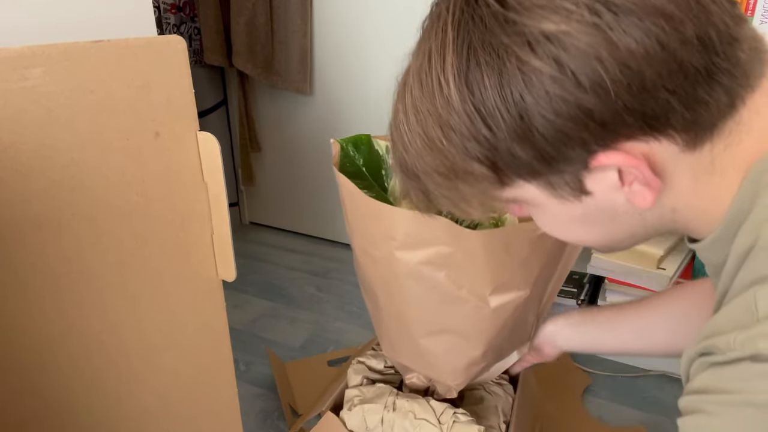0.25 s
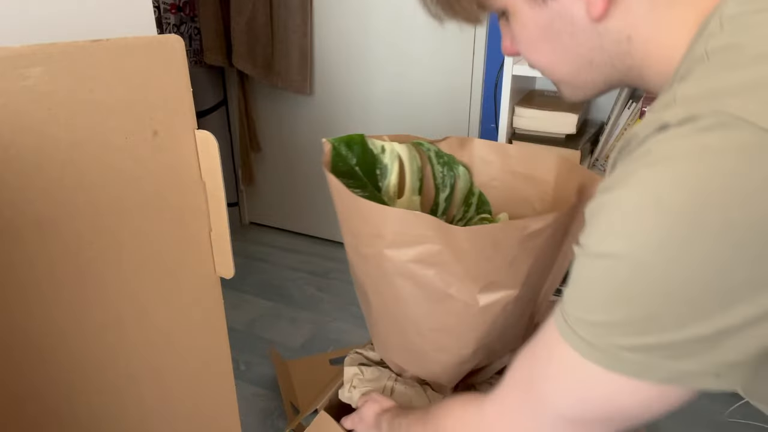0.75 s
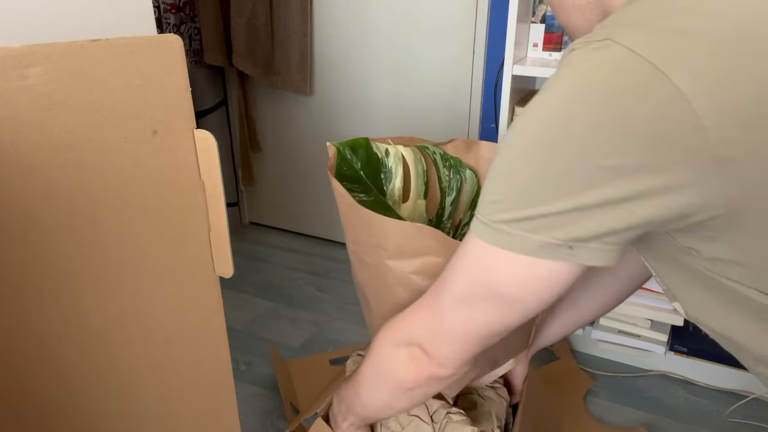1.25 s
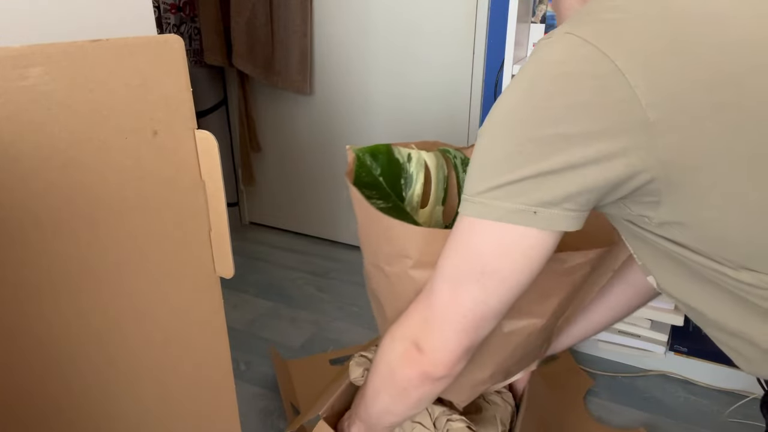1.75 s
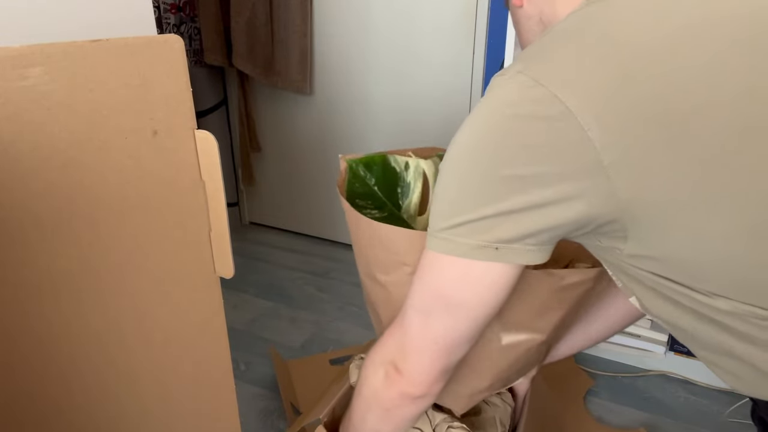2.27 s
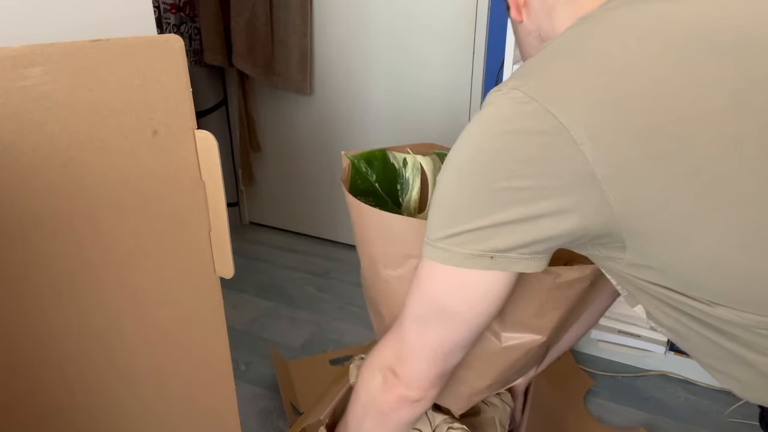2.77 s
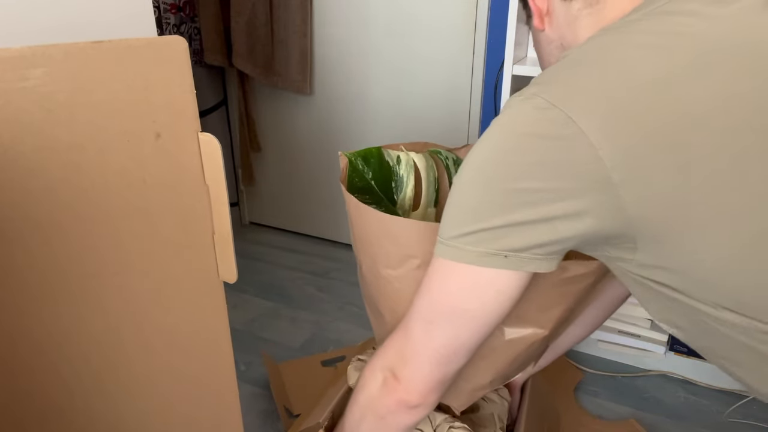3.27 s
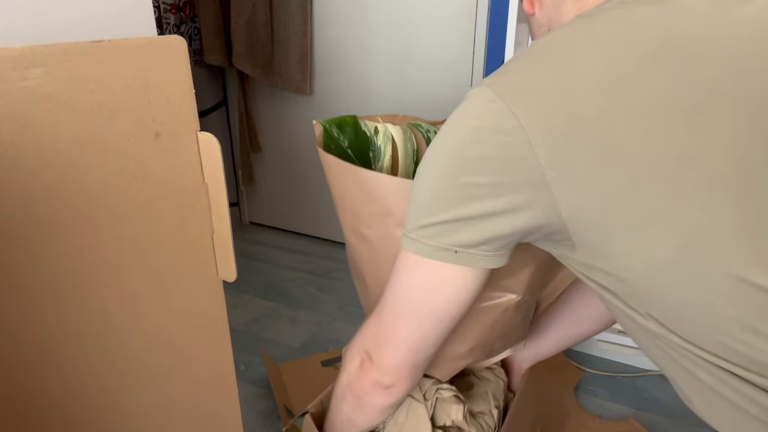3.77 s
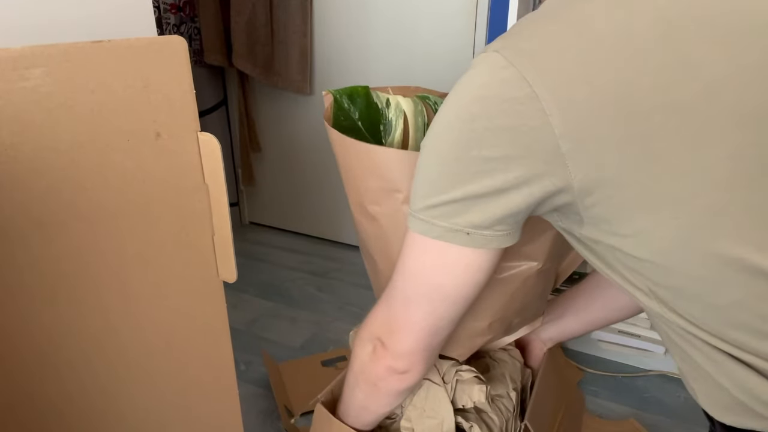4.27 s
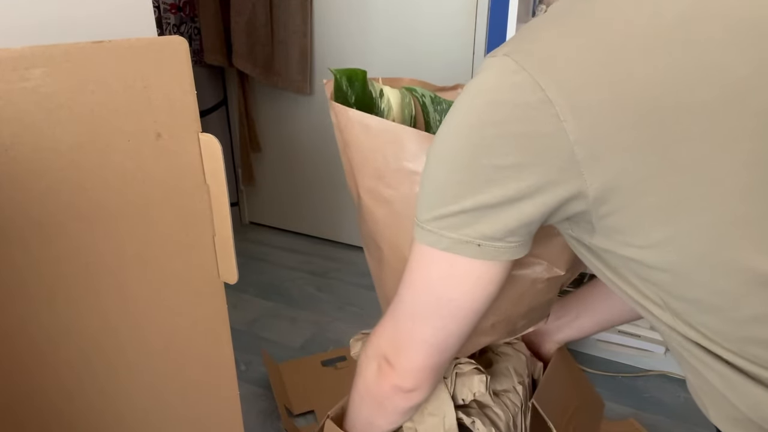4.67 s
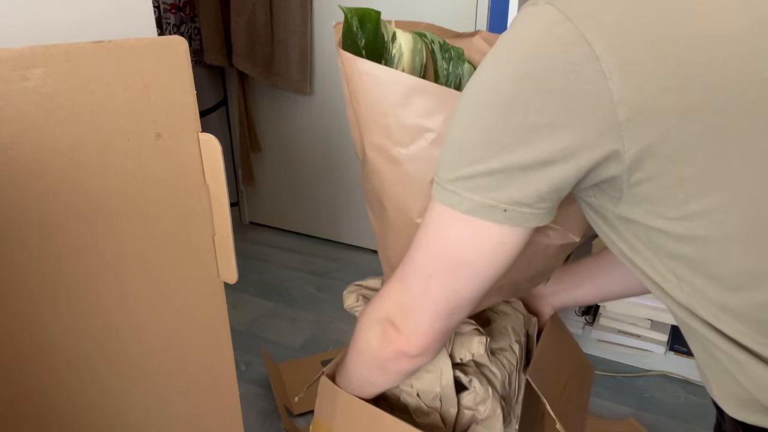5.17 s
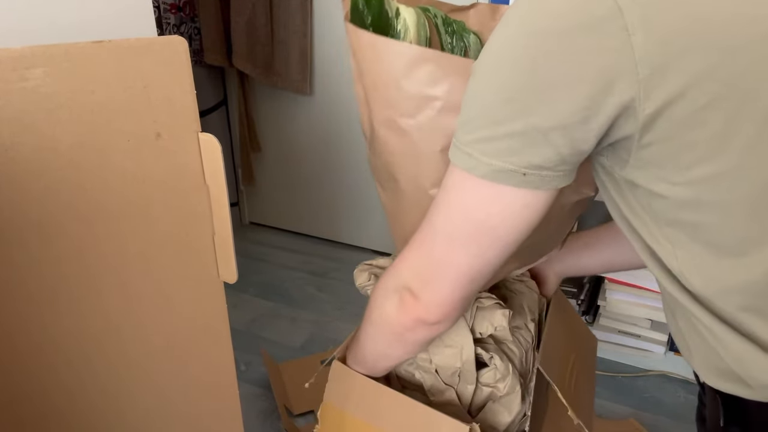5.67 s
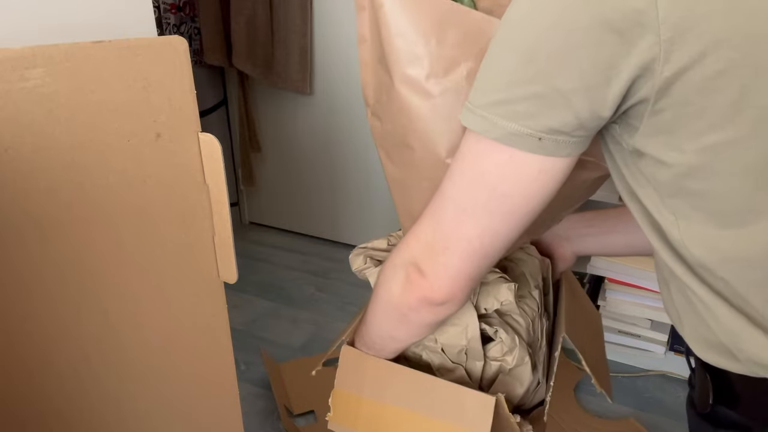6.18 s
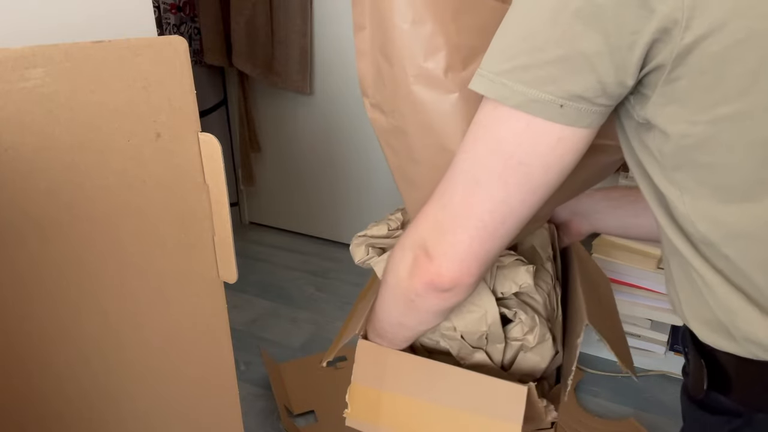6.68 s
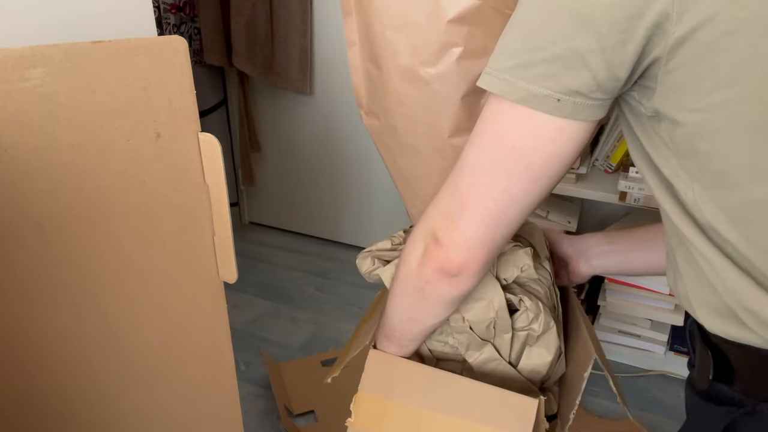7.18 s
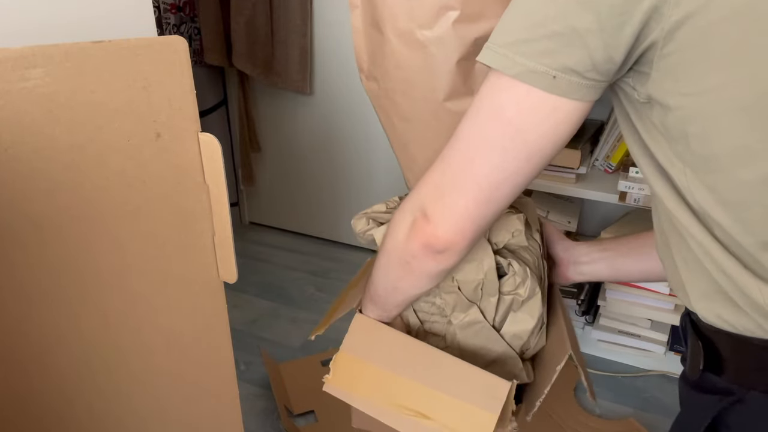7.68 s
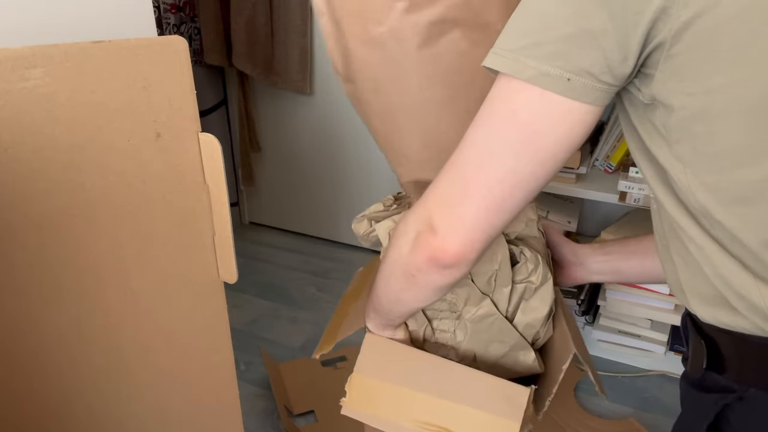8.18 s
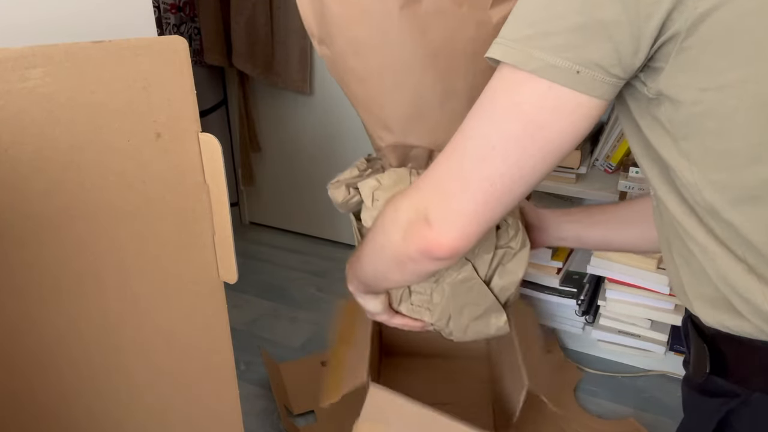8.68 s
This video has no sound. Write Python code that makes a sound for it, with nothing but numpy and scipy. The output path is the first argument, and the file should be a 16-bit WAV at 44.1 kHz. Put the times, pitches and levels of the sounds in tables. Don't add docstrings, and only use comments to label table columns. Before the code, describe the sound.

Close up in a small, fairly dry room, hands dig into crumpled brown packing paper inside a cardboard box. Crisp ticks, snaps and clumpy rustling mix with dull knocks on the box walls, strongest early on. Rustling thickens as a wrapped pot is worked upward, then the empty box falls away with one loud hollow thump, a few quick bounces and a little crackle.

```python
import sys
import numpy as np
from scipy import signal
from scipy.fft import rfft, irfft, next_fast_len
from scipy.io import wavfile

SR = 44100
rng = np.random.default_rng(int(sys.argv[2]) if len(sys.argv) > 2 else 0)


def nominal_scale(level):
    x = np.asarray(level, float) / 20
    return 10 ** x


def transcribe(u):
    v = np.clip(np.atleast_2d(u).T, -1, 1)
    q = np.round(v * 32767).astype(np.int16)
    wavfile.write(sys.argv[1], SR, q)


N = 394254
SIZE = next_fast_len(N + SR)
HZ = np.maximum(np.arange(SIZE // 2 + 1) * SR / SIZE, 1)

# f/Hz, level/dB
HUSH_COLOUR = [(30, -30), (80, -3), (300, -6), (1000, -14), (3000, -21), (15000, -29)]
HUSH_DB = -56
# f/Hz, t60/s
REVERBERATION = [(100, 0.18), (1000, 0.3), (8000, 0.19)]
# f/Hz, level/dB
DIFFUSE_LEVEL = [(60, -14), (130, -10), (300, -7.5), (700, .5), (2000, 2), (4500, 3), (6500, -2),
                 (7700, -9), (8600, -9), (10400, -10), (12800, -7), (15000, -8)]
# f/Hz, phase/rad
PORT_PHASE = [(0, 0), (3450, .4), (4130, -.7), (5340, -1), (6030, -2.3), (7240, -3.1), (8790, -3.4),
              (10500, -6.27), (12800, -6.3), (14400, -9.4), (16100, -9.4)]
# f/Hz, level/dB
PORT_LEVEL = [(60, 3.5), (200, 2), (700, 2.5), (2400, 1.5), (4400, 4), (8100, 1), (10500, 0)]

# f/Hz, level/dB, t60/s
BOX_MODES = [(71, 5.5, 0.15), (83.6, -4, 0.46), (116, 2.5, 0.16), (150.5, -3.5, 0.15), (181.5, 3, 0.097),
             (245, 4.5, 0.094), (274.6, 3, 0.089), (300, -9, 0.057), (378, 1, 0.047), (411, -8.5, 0.18),
             (440, 8.5, 0.049), (520, -9, 0.03), (560, 4, 0.072), (700, -36, 0.053), (670, 9, 0.042),
             (1032, 15, 0.03), (331, -5, 0.1)]
# t/s, peak level/dB, f of the struck
# wall/Hz, scuffle length/ms
KNOCKS = [(0.097, -19, 590, 9.9), (0.115, -21.5, 100, 10), (0.199, -24, 378, 2.2), (0.279, -28, 80, 5.6),
          (0.413, -25.5, 494, 11), (0.689, -32, 498, 2.5), (1.341, -24, 346, 4.3), (1.597, -11.5, 643, 5),
          (1.698, -24, 100, 3.3), (2.3, -26, 520, 4.5), (1.957, -20, 115, 2.6), (1.985, -27, 89.5, 2.5),
          (2.093, -27, 390, 5.8), (2.762, -26.5, 560, 4.1), (5.381, -30, 133, 3.7), (4.303, -23, 500, 4.4),
          (6.925, -26, 90, 3.6), (6.985, -40, 90, 4.5), (8.19, -31, 85, 4), (8.322, -36, 116, 3),
          (1.527, -29, 198, 5.9), (1.623, -9, 310, 3.4), (1.636, -10, 240, 3.4), (1.656, -24, 230, 4),
         (1.808, -16, 196, 3.8), (1.828, -25, 199, 2.9), (2.999, -17.5, 426, 7), (3.006, -15.5, 185, 2.6),
         (3.029, -25, 284, 1.8), (8.682, -2.5, 700, 6.3), (8.689, -1, 417, 4.9), (8.702, -13, 110, 3.1),
         (8.776, -18, 1000, 5.2), (8.684, -0.5, 190, 3.7), (8.702, -6, 396, 4.1), (8.706, -9.5, 278, 3.5),
         (8.721, -12, 125, 5.1), (8.744, -18, 367, 3.1), (8.752, -16, 105, 5.6), (8.795, -24.5, 96, 4),
         (8.818, -14, 108, 5.3), (8.845, -34, 121, 3.7), (8.887, -27.5, 90.3, 6.6), (8.925, -47, 89, 4.2)]
HITS = KNOCKS
CONTACT_CYCLES = 0.4
OWN_DB, OWN_CYCLES = -6.0, 8.1
# t/s, peak level/dB, f/Hz
FLEXES = [(0.126, -36, 131), (.15, -34, 100), (.275, -31, 89), (1.634, -22, 152), (1.702, -33, 94.5),
          (1.75, -36, 80), (1.81, -25, 146), (2.0, -30, 85), (2.671, -33, 140), (3.013, -24, 140),
          (6.925, -25, 149), (7.556, -36, 150), (8.115, -38, 109), (8.322, -31, 129), (8.686, -9, 220),
          (8.712, -7, 292), (8.74, -28, 370), (8.814, -20.5, 255), (8.79, -24, 222), (8.851, -33, 199),
          (8.77, -25, 352), (2.03, -32, 80.6), (1.665, -30, 140), (8.691, -9, 430)]
# t/s, peak level/dB, f/Hz
FLIPS = [(0.413, -32, 606), (0.833, -28, 540), (1.401, -17, 710), (2.095, -30, 388), (2.762, -21, 589),
         (3.282, -30, 942), (3.418, -24, 560), (3.882, -24, 522), (4.302, -39, 711), (4.704, -31, 1330),
         (4.734, -26, 1170), (4.752, -25, 1330), (4.851, -29, 574), (4.876, -20, 545), (5.755, -24, 800),
         (6.019, -20.5, 1430), (6.063, -39, 404), (6.154, -29, 980), (6.243, -27, 813), (6.255, -39, 409),
         (6.912, -21, 990), (7.099, -31, 883), (7.461, -36, 1160), (7.554, -33, 600), (7.628, -22, 597),
         (7.648, -28, 380), (7.725, -23, 600), (7.746, -34, 662), (7.789, -28, 650), (8.762, -16, 380)]
FLIP_DB, FLIP_CYCLES = -5, 12.5
HOLLOW_HZ, HOLLOW_WIDTH_HZ = 1280, 210
SLIDE_S, SLIDE_HALF_S = 4.75, 0.46

# f/Hz, level per Hz/dB
PAPER_COLOUR = [(150, -11), (300, -6), (420, -2), (600, -1), (960, -3), (1500, -6), (3000, -11),
                (5400, -14), (7900, -12.5), (11000, -22.5), (13500, -24), (15800, -32.5), (16500, -52)]
SPLIT_HZ = 2340
# t/s, rummaging level/dB, level of weight leaning on the walls/dB
EFFORT = [(0, -49.5, -57), (.3, -68, -48.5), (.62, -51, -59), (.95, -48, -54), (1.25, -44, -55),
          (1.5, -47, -45.5), (2.05, -48.5, -55), (2.7, -52.5, -57), (3.35, -53, -56), (3.7, -45.5, -57.5),
          (4.1, -51, -51), (4.5, -44.5, -51.5), (5.0, -55, -58), (5.4, -45, -54.5), (6.0, -56, -62),
          (7.15, -47, -52.5), (8.3, -54, -56), (8.94, -56, -75)]
THICK_DB = 4
# t/s, peak level/dB, thick folds
# against it/dB, swell/ms
SQUEEZES = [(.11, -54, 13.5, 27), (.2, -48, 4, 470), (.32, -41, 5.5, 55), (.17, -48, 11, 30),
            (0.421, -38, 5.5, 50), (.485, -41, 0, 60), (.56, -45.5, -2, 120), (.69, -39, 1, 58),
            (.77, -47.5, 3, 56), (.86, -44.5, -9, 100), (1.12, -60, 2, 49), (1.368, -38, 4, 45),
            (1.49, -47, -3, 310), (1.6, -37, 0, 26), (1.82, -39.5, 8, 33), (2.111, -40.5, 3, 71),
            (2.23, -49, 6, 43), (2.321, -43, 4, 44), (2.491, -41, 1.5, 110), (2.67, -51.5, 8.5, 30),
            (2.87, -47, 2, 77), (3.01, -47, 6.5, 65), (3.189, -45.5, 2, 39), (3.29, -52, 12.5, 61),
            (3.48, -54, 13, 370), (3.6, -52, 3, 43), (3.66, -44.5, 6, 130), (3.79, -39.5, -3, 37),
            (3.925, -45, 6.5, 69), (4.1, -43.5, -3, 50), (4.31, -54.5, 15, 120), (4.41, -44, 0, 60),
            (.092, -42.5, 9, 20), (2.992, -37, -1, 9), (1.335, -39, 3, 17),
            (4.72, -39.5, 5.5, 83), (4.864, -42, 7, 36), (4.95, -54, 12, 62), (5.14, -46.5, 6, 40),
           (5.329, -44, -5, 75), (5.45, -48, 4, 32), (5.76, -51, 7, 45), (6.03, -45.5, -9, 43),
           (6.17, -44.5, 4, 150), (6.257, -46, 6.5, 23), (6.55, -51.5, 7, 540), (6.575, -41, -1, 53),
           (6.7, -41, 2.5, 50), (6.922, -34.5, 6, 43), (6.97, -37, 2.5, 115), (7.11, -56, 10, 31),
           (7.22, -40.5, 6, 47), (7.46, -45.5, 7, 100), (7.527, -35.5, 1, 30), (7.69, -43, 3.5, 71),
           (7.79, -39.5, 0.5, 50), (7.92, -46.5, 7.5, 190), (7.98, -43, 5, 120), (8.12, -39, -2, 46),
           (8.181, -34, 4, 58), (8.33, -50.5, 10.5, 160), (8.528, -42.5, 3.5, 120), (8.695, -35, 5.5, 19),
           (8.78, -43.5, 7, 44), (8.677, -36, 11, 8)]
RELEASE_SLOWER = 1.06
WALLS_SQUEEZED_DB = -21.5
# t/s, depth/dB, half length/s
PAUSES = [(0.617, 1.5, 0.037), (1.275, 1, 0.033), (1.71, 1.5, 0.085), (1.955, 4, 0.15), (2.97, 4, 0.022),
          (3.097, 11, 0.067), (3.407, 4.5, 0.044), (3.98, 5.5, 0.03), (4.675, 6, 0.049), (5.068, 17, 0.052),
          (5.226, 3, 0.047), (5.92, 0.5, 0.062), (6.412, 5, 0.1), (6.79, 2, 0.095), (7.34, 4.5, 0.15),
          (8.032, 7.5, 0.053), (8.632, 24, 0.07)]
TAUT_S, TAUT_DB = 0.029, 0.5

# t/s, peak level/dB
SPITS = [(0.1999, -21), (0.2902, -34), (0.5521, -31), (0.7542, -41), (1.234, -21), (1.3394, -34),
         (1.4795, -36), (1.5165, -30), (1.5913, -30), (1.8023, -30), (2.4613, -24), (2.9951, -28),
         (3.1666, -31), (3.5748, -43), (3.6087, -32), (3.7299, -34), (3.8786, -35), (4.0811, -39),
         (4.2502, -41), (4.6857, -34), (4.9347, -46), (5.1372, -41), (5.4331, -35), (6.1539, -37),
         (6.2462, -32), (6.4921, -47), (6.5256, -37), (6.6124, -29), (6.6543, -39), (6.6543, -33),
         (6.6862, -37), (6.9132, -28), (7.7877, -32), (8.6815, -27), (8.782, -29), (8.884, -32)]
SPIT_DB, SPIT_T60_S, SPIT_LOW_HZ, SPIT_HIGH_HZ = -4, 0.015, 8300, 15000
# t/s, peak level/dB
POPS = [(0.378, -51), (0.833, -30.5), (1.097, -47), (1.4, -25.5), (1.515, -23), (1.578, -22.5),
        (1.721, -32), (1.789, -35), (1.981, -34), (2.484, -29), (2.598, -35), (2.669, -36), (2.739, -33),
        (2.763, -32.5), (3.418, -28.5), (3.484, -30.5), (3.527, -30), (3.879, -27), (4.302, -31),
        (4.593, -39), (5.092, -33), (5.687, -40), (5.756, -38), (6.021, -38), (6.296, -33), (6.824, -36),
        (7.462, -33), (7.629, -33), (7.745, -29.5), (8.069, -51)]
# t/s, peak level/dB, after-crackle level/dB
TICKS = [(0.202, -28, -29), (.552, -24.5, -10), (1.299, -32, 1), (1.858, -31, -11), (2.214, -35, -7),
         (2.462, -23, -15.5), (2.708, -32.5, -18), (3.146, -36, -11), (3.468, -30.5, -7),
         (3.575, -20.5, -7), (3.909, -34, 1), (4.038, -32.5, -5), (4.218, -46, -21), (4.251, -24, -20),
         (4.687, -23, -13), (4.937, -32.5, -11), (5.128, -34.5, -2.5), (5.8, -28.5, -19), (5.837, -35, -13),
         (6.064, -36, -10), (6.138, -31, -3), (6.155, -22, -6.5), (6.493, -25.5, -14), (6.526, -30, -0.5),
         (6.556, -32, -16), (6.612, -31, -4), (6.89, -37, -13), (7.891, -28, -16), (8.152, -30, 3),
         (8.885, -36, -5), (0.086, -31, -15), (0.471, -31.5, 0.5), (2.226, -31, -4.5), (3.655, -34, -16),
         (3.731, -29, -12), (4.635, -37, -13), (4.753, -35, -17), (4.792, -38, -4), (5.909, -39.5, -4),
         (6.253, -27, -15), (6.805, -43, -3), (6.897, -26, -14), (6.972, -28, -13), (8.051, -43, -7),
         (8.321, -34, -1)]
# t/s, crack peak level/dB, thick part level/dB, after-crackle level/dB
SNAPS = [(0.096, -37, -33, -9), (0.292, -30, -42, -12), (.413, -33, -31, -1.5), (0.678, -25.5, -30.5, -3),
         (.755, -27, -32, -1.5), (1.114, -30.5, -27, -8.5), (1.234, -11.5, -23, -30),
         (1.341, -28.5, -30.5, -2), (1.375, -26, -23, -16), (1.48, -36, -29.5, -2.5),
         (1.592, -19, -19.5, -2), (1.804, -37, -22, -11), (2.097, -36, -28, -17), (2.859, -39, -30.5, -4),
         (2.995, -22, -22.5, -20), (3.167, -19, -38, -6), (3.281, -33.5, -29.5, -6.5),
         (3.61, -22.5, -40, -6.5), (4.082, -22.5, -25.5, -8), (4.878, -46, -28, -19),
         (5.435, -23.5, -37, -8), (6.244, -34.5, -37, 1), (6.645, -31, -32.5, 0), (6.685, -27.5, -32, -2.5),
         (6.915, -18, -24, -10.5), (7.099, -22.5, -25.5, -13.5), (7.788, -25, -26.5, -13),
         (8.681, -14, -7.5, -9), (8.763, -44, -25, -10), (8.778, -33, -32, -8)]
TICK_THICK_DB, POP_CRACK_DB = -18, -8.5
SNAP_T60_S, TICK_T60_S, POP_T60_S, POP_AFTER_DB = 0.14, 0.099, 0.15, -8
CRACK_DULL_HZ = 14000


def rms_one(x):
    return x / np.sqrt(np.mean(x ** 2) + 1e-20)


def on_grid(points):
    hz, value = np.transpose(points)
    return np.interp(np.log(HZ), np.log(np.maximum(hz, 1)), value)


def shaped(x, response):
    return irfft(rfft(x, SIZE) * response, SIZE)[..., :N]


def causal(db):
    cepstrum = irfft(db * np.log(10) / 20, SIZE)
    cepstrum[1:SIZE // 2] *= 2
    cepstrum[SIZE // 2 + 1:] = 0
    return np.exp(rfft(cepstrum))


def resonance(hz, r):
    return [1, -2 * r * np.cos(2 * np.pi * hz / SR), r * r]


def drift(rate_hz):
    r = np.exp(-2 * np.pi * rate_hz / SR)
    noise = rng.standard_normal(N + SR)
    return rms_one(signal.lfilter([1], [1, -2 * r, r * r], noise)[SR:])


def hush():
    return nominal_scale(HUSH_DB) * rms_one(shaped(rng.standard_normal(N), nominal_scale(on_grid(HUSH_COLOUR))))


def echoes():
    age, tails = np.arange(SR // 2) / SR, 0
    early = 1 + 5.7 * nominal_scale(-60 * age / 0.017)
    for k, (hz, t60) in enumerate(REVERBERATION):
        band = on_grid([(row[0], float(j == k)) for j, row in enumerate(REVERBERATION)])
        echo = rng.standard_normal((2, len(age))) * nominal_scale(-60 * age / t60) * early * (age > .0008)
        echo = echo / np.sqrt(np.sum(echo ** 2, axis=1, keepdims=True))
        tails = tails + np.sqrt(band) * rfft(echo, SIZE)
    return tails


def room(direct, spots=7):
    near = nominal_scale(32 * np.array([drift(17.0) for spot in range(spots)]))
    shares = direct * near / np.sqrt(np.sum(near ** 2, axis=0))
    diffuse = sum(rfft(share, SIZE) * echoes() for share in shares)
    wet = nominal_scale(on_grid(DIFFUSE_LEVEL))
    sides = np.array([[.5], [-.5]])
    ports = nominal_scale(sides * on_grid(PORT_LEVEL)) / np.sqrt(1 + wet ** 2)
    lead = np.exp(1j * sides * np.interp(HZ, *np.transpose(PORT_PHASE)))
    return irfft(ports * (rfft(direct, SIZE) * lead + wet * diffuse), SIZE)[:, :N]


def blows():
    age_ms = np.arange(1024) / SR * 1000
    scuffles = rng.standard_normal((len(HITS), 1024))
    s, db, centre_hz, length_ms = np.transpose(HITS)[..., None]
    box_hz, box_db, _ = np.transpose(BOX_MODES)
    strengths = rng.normal(0, 1.5, (len(HITS), len(BOX_MODES)))
    strengths = strengths - 13 * abs(np.log2(box_hz / centre_hz)) ** 1.4
    total_db = 10 * np.log10(np.sum(nominal_scale(strengths + box_db) ** 2, axis=1, keepdims=True))
    strengths = strengths + db - 13.0 - total_db
    contact = np.sin(np.pi * np.minimum(age_ms * centre_hz / 1000 / CONTACT_CYCLES, 1)) ** 2
    contact = contact / contact.sum(axis=1, keepdims=True)
    pushes = 0.16 * scuffles * np.exp(-age_ms / length_ms) + 1.49 * contact
    return s[:, 0], pushes, strengths


def box(rub):
    times, pushes, strengths = blows()
    walls = 0
    for k, (hz, mode_db, t60) in enumerate(BOX_MODES):
        force = np.zeros(N + 1024)
        for at, push, strength_db in zip(times, pushes, strengths[:, k]):
            start = round(at * SR)
            force[start:start + 1024] += nominal_scale(strength_db) * push
        drive = [force[:N] + 1e-18, rub]
        rung = signal.lfilter([0, np.sin(2 * np.pi * hz / SR)], resonance(hz, nominal_scale(-60 / (t60 * SR))), drive)
        walls = walls + nominal_scale(mode_db) * rung * (-1) ** k
    return walls


def thuds(rows, gain_db, cycles):
    out, age = np.zeros(N + 8192), np.arange(8192) / SR
    for s, db, hz, *_ in rows:
        turns, start = age * hz, round(s * SR)
        swing = np.minimum(2 * turns, 1) * np.sin(2 * np.pi * turns)
        out[start:start + 8192] += nominal_scale(db + gain_db - 60 * turns / cycles) * swing
    return out[:N]


def hollow(paper):
    r = np.exp(-np.pi * HOLLOW_WIDTH_HZ / SR)
    opening = np.clip(2 - 2 * abs(np.arange(N) / SR - SLIDE_S) / SLIDE_HALF_S, 0, 1)
    return opening * signal.lfilter([(1 - r * r) / 2, 0, (r * r - 1) / 2], resonance(HOLLOW_HZ, r), paper)


def buckles(per_s, spread_db, clump_db, patch_t60, click):
    clumps = clump_db * (drift(9.6) + 0.38 * drift(60))
    sizes = nominal_scale(spread_db * np.minimum(rng.exponential(1, N), 5) + clumps)
    born = sizes * (rng.random(N) < per_s * nominal_scale(clumps) / SR)
    shiver = np.sqrt(signal.lfilter([1], [1, -nominal_scale(-120 / (patch_t60 * SR))], born ** 2 + 1e-12))
    return rms_one(rng.standard_normal(N) * (shiver + click * born))


def folds():
    big = [(s, db, thick_db, SNAP_T60_S, after_db) for s, db, thick_db, after_db in SNAPS]
    thin = [(s, db, db + TICK_THICK_DB, TICK_T60_S, after_db) for s, db, after_db in TICKS]
    thick = [(s, db + POP_CRACK_DB, db, POP_T60_S, POP_AFTER_DB) for s, db in POPS]
    return big + thin + thick


def hands():
    now = np.arange(N) / SR
    s, work_db, weight_db = np.transpose(EFFORT)
    pause_db = -sum(depth_db * np.clip(1.6 - 1.61 * abs(now - at) / half, 0, 1) for at, depth_db, half in PAUSES)
    for at, *_ in folds():
        pause_db[round((at - TAUT_S) * SR):round(at * SR)] -= TAUT_DB
    thin = nominal_scale(np.interp(now, s, work_db)) ** 2
    thick = thin * nominal_scale(THICK_DB) ** 2
    walls = nominal_scale(np.interp(now, s, weight_db)) ** 2
    for at, db, thick_db, swell_ms in SQUEEZES:
        near = slice(max(round((at - .6) * SR), 0), round((at + .6) * SR))
        away = np.maximum(at - now[near], (now[near] - at) / RELEASE_SLOWER)
        power = nominal_scale(db - 10000 * away / swell_ms) ** 2
        thin[near] += power
        thick[near] += power * nominal_scale(thick_db) ** 2
        walls[near] += power * nominal_scale(thick_db + WALLS_SQUEEZED_DB) ** 2
    return np.sqrt([thin, thick, walls]) * nominal_scale(pause_db * [[1], [1], [.4]])


def spits():
    out, age = np.zeros(N + 1024), np.arange(1024) / SR
    for s, db in SPITS:
        start = round(s * SR)
        out[start:start + 1024] += nominal_scale(db + SPIT_DB - 60 * age / SPIT_T60_S) * rng.standard_normal(1024)
    band = signal.butter(2, [SPIT_LOW_HZ, SPIT_HIGH_HZ], "band", fs=SR, output="sos")
    return signal.sosfilt(band, out[:N] + 1e-18)


def snaps():
    thin, thick, age = np.zeros(N + 8192), np.zeros(N + 8192), np.arange(8192) / SR
    for s, crack_db, thick_db, t60, after_db in folds():
        noise, at = rng.standard_normal((3, 8192)), round(s * SR)
        after = nominal_scale(after_db - 60 * age / t60 + 0.36 * abs(noise[2]))
        crack = 1.38 * np.sign(noise[0]) * nominal_scale(-60 * age / 0.0056)
        thin[at:at + 8192] += nominal_scale(crack_db - 7.5) * (crack + noise[0] * after)
        thick[at:at + 8192] += nominal_scale(thick_db - 6.0) * noise[1] * (nominal_scale(-60 * age / 0.013) + after)
    dull = np.exp(-2 * np.pi * CRACK_DULL_HZ / SR)
    return 1.23 * signal.lfilter([1 - dull], [1, -dull], thin[:N]), thick[:N]


def thin_and_thick(thin, thick):
    above = -10 * np.log10(1 + (SPLIT_HZ / HZ) ** 4)
    below = -10 * np.log10(1 + (HZ / SPLIT_HZ) ** 4)
    out = 0
    for part, edge in ((thin, above), (thick, below)):
        response = causal(on_grid(PAPER_COLOUR) + edge)
        out = out + shaped(part, response / np.sqrt(np.mean(abs(response) ** 2)))
    return out


def scene():
    thin_gain, thick_gain, walls_gain = hands()
    fine = buckles(1500, spread_db=1.0, clump_db=0.26, patch_t60=0.038, click=4.6)
    coarse = buckles(500, spread_db=1.5, clump_db=1.2, patch_t60=0.22, click=0.42)
    sparse = buckles(110, spread_db=4.0, clump_db=1.0, patch_t60=0.031, click=2.0)
    thin, thick = snaps()
    thin = thin + thin_gain * (0.8 * fine + 0.47 * sparse)
    thick = thick + nominal_scale(-2.5) * thick_gain * (0.3 * fine + 0.91 * coarse + 0.34 * sparse)
    paper = thin_and_thick(thin, thick)
    knocked, rubbed = box(signal.lfilter([1], [1, -.97], coarse))
    walls = knocked + walls_gain * rms_one(rubbed) + thuds(HITS, OWN_DB, OWN_CYCLES)
    panels = thuds([*FLIPS, *FLEXES], FLIP_DB, FLIP_CYCLES)
    return room(paper + hollow(paper) + spits() + walls + panels + hush())


def low_pass(x):
    return signal.sosfilt(signal.butter(12, 16530, fs=SR, output="sos"), x)


def record(dry):
    rounded = 1.079 * np.tanh(dry / 0.84)
    mix = signal.sosfilt(signal.butter(4, 66, "high", fs=SR, output="sos"), rounded)
    return low_pass(mix)


dry = scene()
out = record(dry)
transcribe(out)
```